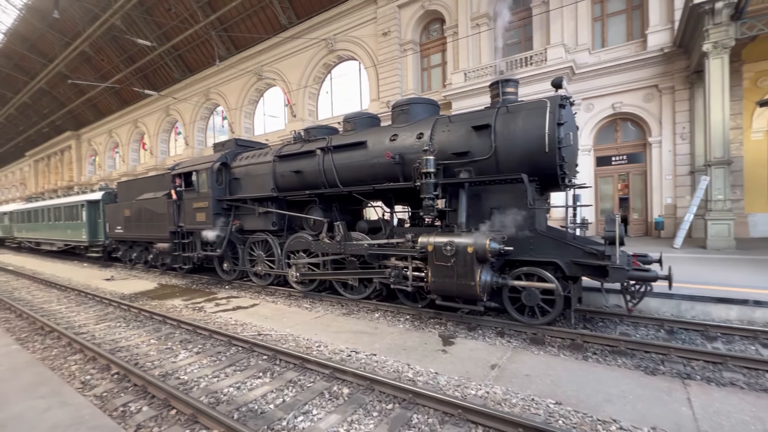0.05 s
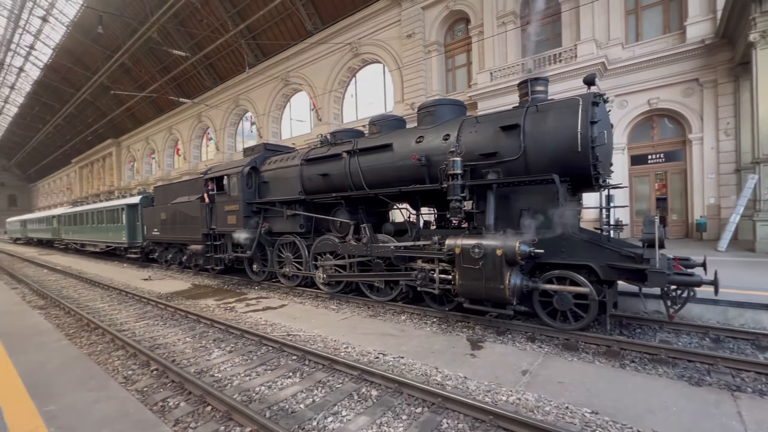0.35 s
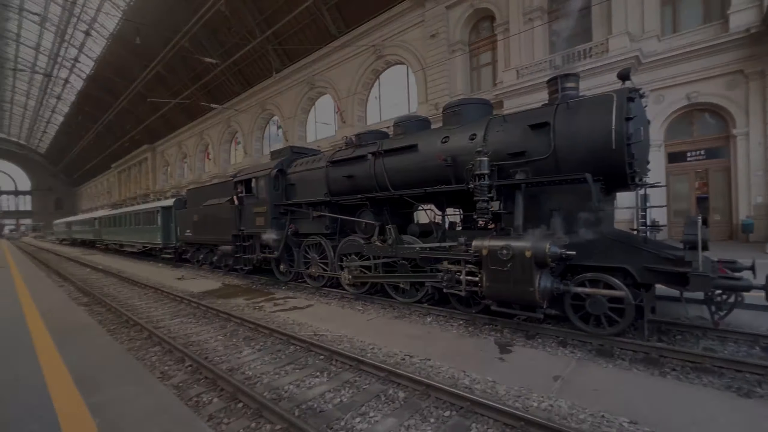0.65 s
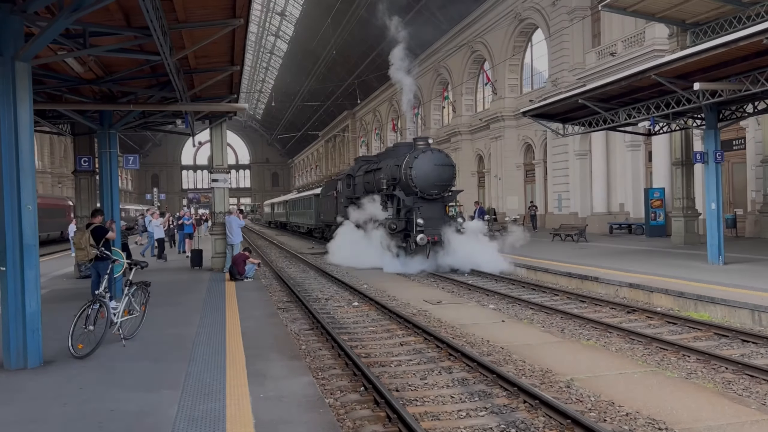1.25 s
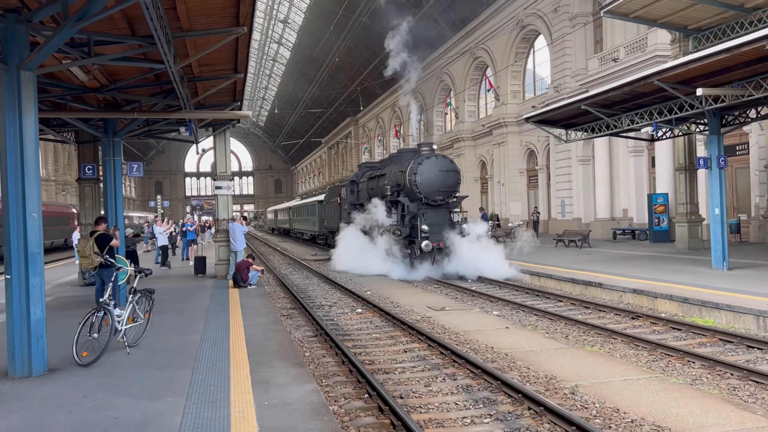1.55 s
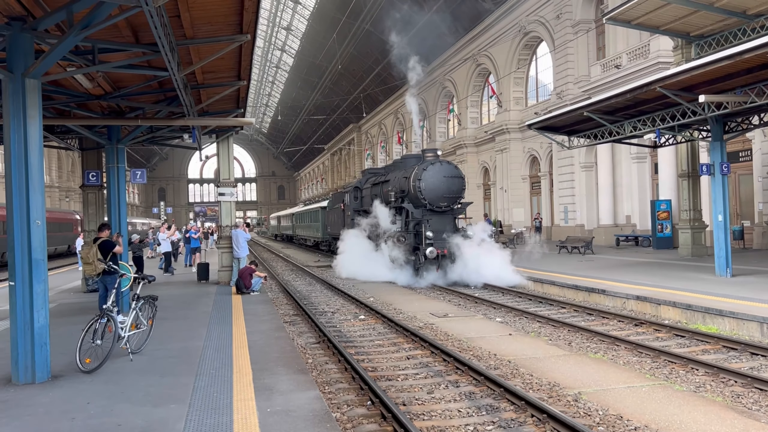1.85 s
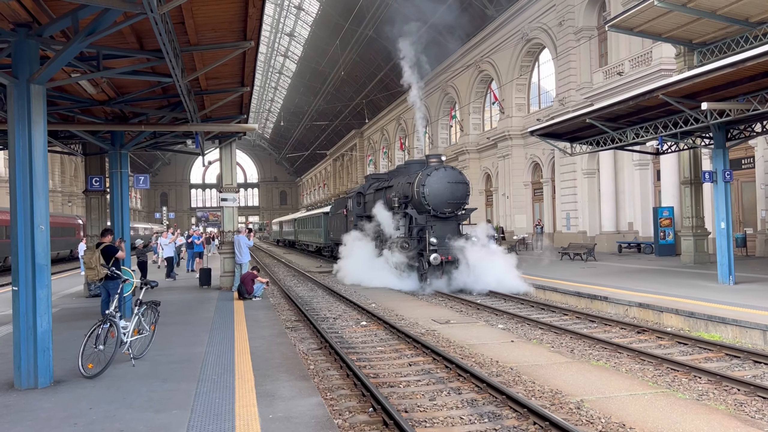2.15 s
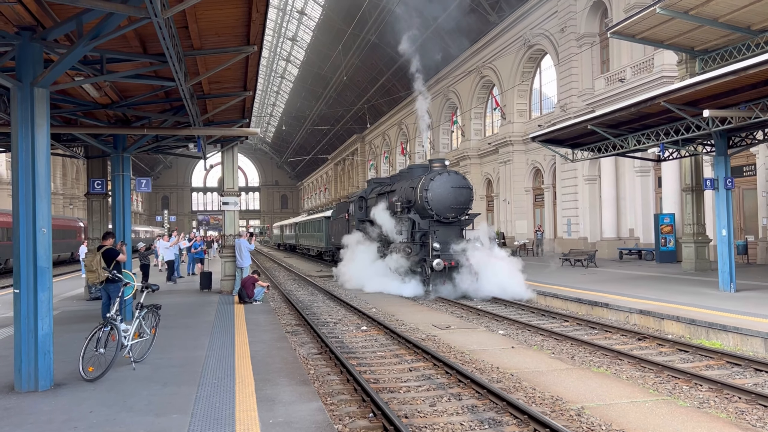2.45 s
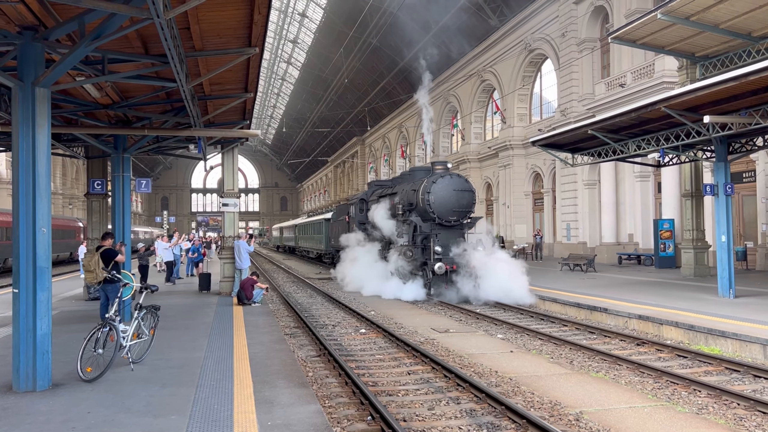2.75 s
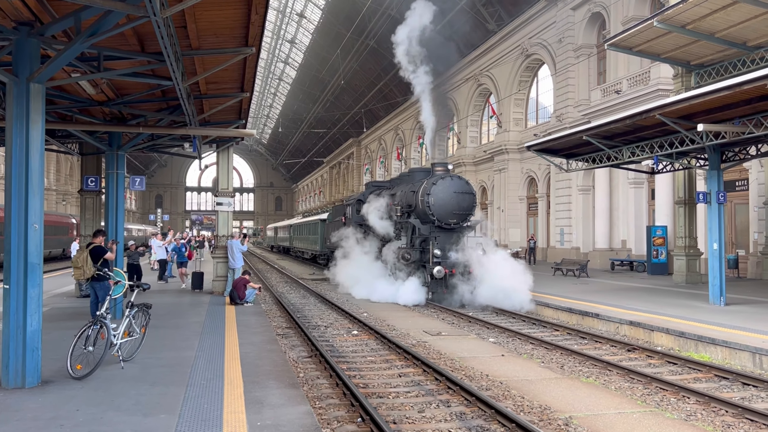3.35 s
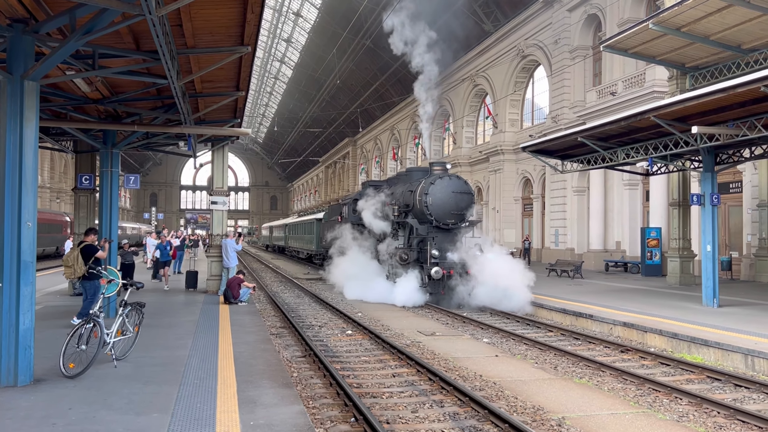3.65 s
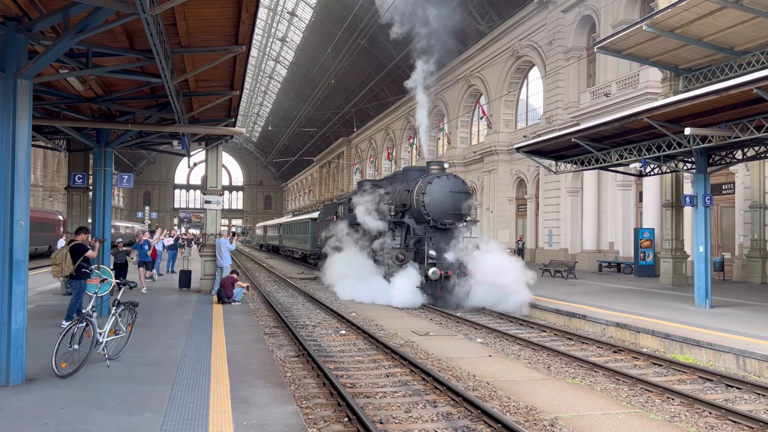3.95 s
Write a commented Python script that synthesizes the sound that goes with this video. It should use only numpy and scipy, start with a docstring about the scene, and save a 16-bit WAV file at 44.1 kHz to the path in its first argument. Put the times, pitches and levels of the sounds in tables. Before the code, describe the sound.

A steam locomotive hisses loudly in a large station hall and gives one deep chuff.

```python
"""Steam locomotive in a station hall

With the microphone at the engine's side, a rush of steam dies away over the idling engine and fades out.
The sound fades in again from the front: the open cylinder drain cocks swell to a dense hiss with a
hoarse, slowly rising resonance, the hall returns a diffuse roar, and the chimney gives one deep chuff."""
import sys
import numpy as np
from scipy import signal
from scipy.fft import rfft, irfft, next_fast_len
from scipy.io import wavfile
from scipy.ndimage import uniform_filter1d, map_coordinates

SR = 44100
rng = np.random.default_rng(int(sys.argv[2]) if len(sys.argv) > 2 else 0)


def transcribe(u):
    """Save the signal u as a 16-bit wav file named by the first command-line argument.

    u: samples, shape (n,) or (channels, n), limited to [-1, 1]; the rate is SR.
    q: integer samples, one column per channel.
    """
    v = np.clip(np.atleast_2d(u).T, -1, 1)
    q = np.round(v * 32767).astype(np.int16)
    wavfile.write(sys.argv[1], SR, q)


N = 176400
T = np.arange(N) / SR


def amp(db):
    """Decibels to gain."""
    return 10 ** (np.asarray(db) / 20)


def unit(x):
    """Scale to rms 1."""
    return x / np.sqrt(np.mean(x ** 2) + 1e-20)


def along(points, hz):
    """Read (f/Hz, value) points on a log frequency axis."""
    freqs, values = np.transpose(points)
    return np.interp(np.log(hz + 1), np.log(freqs + 1), values)


def curve(points):
    """Read (t/s, value) points at every sample."""
    return np.interp(T, *np.transpose(points))


def wobble(rate_hz):
    """A smooth random curve with rate_hz knots a second."""
    return map_coordinates(rng.standard_normal(4096), [T * rate_hz], mode="wrap")


def filtered(x, response):
    """Filter x by a complex response of frequency."""
    size = next_fast_len(N + SR // 4)
    return irfft(rfft(x, size) * response(np.fft.rfftfreq(size, 1 / SR)), size)[..., :N]


def lean(left_db):
    """Left and right gains for a source louder on the left by left_db."""
    return amp(np.array([[.5], [-.5]]) * left_db)


def stereo(mid, side):
    """Mid and side to left and right, at rms 1."""
    return unit(np.array([mid + side, mid - side]))


def firm(x):
    """Even out the slow swells of a stereo noise, leaving rms 1."""
    power = uniform_filter1d(np.mean(x ** 2, axis=0), size=1500)
    return x / np.sqrt(np.abs(power) + 1e-12)


def rush(spectrum, correlation, patchy_db):
    """Turbulent stereo noise of rms 1, with brief patches of random gain; spectrum is a density shape."""
    def mid_side_gains(hz):
        angle = np.arccos(np.clip(along(correlation, hz), -.99, .99)) / 2
        return amp(along(spectrum, hz)) * [np.cos(angle), np.sin(angle)]

    cells = signal.stft(rng.standard_normal((2, N)), nperseg=256)[2]
    patches = uniform_filter1d(rng.standard_normal(cells.shape[1:]), size=8, axis=0)
    patches = uniform_filter1d(patches, size=10, axis=1)
    noise = signal.istft(cells * amp(patchy_db * unit(patches)), nperseg=256)[1][:, :N]
    return stereo(*filtered(noise, mid_side_gains))


def resonance(centre_hz, half_width_hz, side_db):
    """Stereo noise of rms 1 in a narrow band around a steady or moving centre."""
    noise = rng.standard_normal((2, 2, N))
    in_phase, quadrature = filtered(noise, lambda hz: 1 / np.sqrt(1 + (hz / half_width_hz) ** 4))
    phase = 2 * np.pi * np.cumsum(centre_hz * np.ones(N)) / SR
    mid, side = in_phase * np.cos(phase) + quadrature * np.sin(phase)
    return stereo(mid, side * amp(side_db))


# Steam hiss at the engine's side, with a deep gap near 10 kHz from audio coding (f/Hz, level/dB)
STEAM_SPECTRUM = [(200, -16), (450, -10.5), (750, -8), (1020, -2.5), (1400, -2), (1900, -3), (2400, -4),
                  (3600, -9), (4400, -9.5), (4900, -7), (5700, -10), (6300, -11), (7000, -12), (8200, -16),
                  (9200, -21), (10200, -47), (11400, -21), (13000, -31), (15500, -38)]
STEAM_CORRELATION = [(300, 0.5), (700, .3), (1300, 0.43), (2200, -0.14), (5000, -0.085), (7000, 0.3),
                     (10000, -0.35), (12000, 1), (14500, -1.1)]  # its stereo image (f/Hz, left-right correlation)
STEAM_NOTCHES = [(5340, 200, -8), (7530, 300, -12)]  # hollows in its colour (f/Hz, half width/Hz, level/dB)
STEAM_RINGS = [(1230, 10, -12.5), (1427, 86, -8.5)]  # its resonances (f/Hz, half width/Hz, level/dB re the steam)
STEAM_LEVEL = [(0, -21.5), (.1, -26.5), (.26, -32), (.5, -37.5), (.88, -40.5)]  # its decay, before the fade (t/s, level/dB)
def dying_steam():
    """At the engine's side, a little right of the microphone: ringing steam dies away in the hall."""
    def hollows(hz):
        return amp(sum(db * np.exp(-((hz - centre) / width) ** 2) for centre, width, db in STEAM_NOTCHES))

    steam = filtered(rush(STEAM_SPECTRUM, STEAM_CORRELATION, patchy_db=0.55), hollows)
    ringing = sum(amp(db) * resonance(hz, width, side_db=-1) for hz, width, db in STEAM_RINGS)
    level_db = curve(STEAM_LEVEL) + 0.49 * wobble(25.3)
    return amp(level_db) * (steam + ringing) * lean(left_db=-1.5)


ENGINE_SPECTRUM = [(25, -16), (45, -4.5), (85, 1), (125, -5.5), (170, -3.5), (250, -5.5), (330, -14.5),
                   (600, -10.5), (1500, -27), (6000, -30)]  # idling engine from the side (f/Hz, level/dB)
ENGINE_LEVEL = [(.3, -41), (.85, -40)]  # its rumble, before the fade (t/s, level/dB)
LOW_CORRELATION = [(60, 0.96), (160, 0.98), (350, 0.78), (700, 0.55), (1500, 0.16)]  # stereo image of all low rushes (f/Hz, left-right correlation)
def idling_engine(hum_hz=367, hum_db=-52.5):
    """Beside the standing engine: an even rumble and a faint, wavering hum."""
    hum = amp(hum_db + 1.9 * wobble(8)) * np.sqrt(2) * np.sin(2 * np.pi * hum_hz * T)
    rumble = firm(rush(ENGINE_SPECTRUM, LOW_CORRELATION, patchy_db=1.2))
    return amp(curve(ENGINE_LEVEL)) * rumble + hum


STEAM_FLOW = [(.9, -10), (1.25, -11), (1.55, -6.5), (1.83, -3.5), (2.05, -0.5), (2.25, 0.5), (2.6, 0),
              (3.0, 0.4), (3.4, -2), (3.75, -3), (4, -3)]  # strength of the flow from the cocks (t/s, level/dB)
# Diffuse roar of the hall, with a deep gap near 10 kHz from audio coding (f/Hz, level/dB)
ROAR_SPECTRUM = [(300, -16.5), (800, -10.5), (1150, -3), (1600, -1), (2200, -2), (2500, -5), (2850, -5.5),
                 (3100, -7.5), (3450, -6.5), (4400, -6.5), (5200, -6.5), (5650, -9.5), (6300, -11),
                 (7000, -11), (10000, -50), (16000, -29)]
ROAR_CORRELATION = [(500, 0.75), (1100, -0.071), (1750, 0.13), (2600, 0.47), (3400, 0.064), (4800, 0.3),
                    (5800, -0.29), (6800, 0.12), (9000, -0.098)]  # its stereo image (f/Hz, left-right correlation)
ROAR_BALANCE = [(400, 1.5), (1400, 4.3), (2500, 3.8), (5200, 4.5), (6500, 2.5)]  # its lean to the left (f/Hz, level/dB left minus right)
JET_SPECTRUM = [(2000, -10), (5500, -12), (7200, -1.5), (8600, 2), (10100, -5.5), (11500, 2), (12800, -3.5),
                (14300, -3), (15600, -8.5)]  # hiss straight from the jets (f/Hz, level/dB)
JET_CORRELATION = [(5000, 0.41), (8500, 0.93), (10200, 1), (11700, 0.99), (13500, 1), (15500, .6)]  # its stereo image (f/Hz, left-right correlation)
def drain_cocks(roar_db=-23, hiss_db=-26.5, right_lead_ms=0.1474):
    """From the front: one sputtering flow drives the direct hiss, a little right, and the hall's roar."""
    def right_first(hz):
        return np.exp(1j * np.pi * hz * right_lead_ms / 1000 * np.array([[-1], [1]]))

    flow_db = curve(STEAM_FLOW) + 0.16 * wobble(21.6) + 0.29 * wobble(160)
    roar = rush(ROAR_SPECTRUM, ROAR_CORRELATION, patchy_db=0.6)
    roar = filtered(roar, lambda hz: lean(along(ROAR_BALANCE, hz)))
    hiss = filtered(rush(JET_SPECTRUM, JET_CORRELATION, patchy_db=0.83), right_first)
    hiss_gain = amp(hiss_db + 1.01 * flow_db + 0.12 * wobble(60))
    return amp(roar_db + flow_db) * roar + hiss_gain * hiss


ROAR_RINGS = [(652, -46.5), (1209, -39.5), (1005, -46.5), (1550, -41.5), (2690, -41.5), (3380, -42),
              (3960, -45)]  # faint steady pitches within the roar (f/Hz, level/dB re the flow)
def roar_rings(relative_half_width=0.016):
    """Left of the microphone: narrow resonances swell with the flow."""
    def peaks(hz):
        power = sum(amp(db) ** 2 / centre / (1 + ((hz / centre - 1) / relative_half_width) ** 2) ** 2
                    for centre, db in ROAR_RINGS)
        return np.sqrt(power)

    mid, side = filtered(rng.standard_normal((2, N)), peaks)
    total_rms = np.sqrt(sum(amp(db) ** 2 for _, db in ROAR_RINGS))
    return total_rms * amp(curve(STEAM_FLOW)) * stereo(mid, side * amp(-1)) * lean(left_db=4.3)


CLOUD_SPECTRUM = [(150, -17), (300, -9.5), (480, -2.5), (670, 1), (850, -2.5), (1200, 0.5), (2500, -27)]  # billowing steam (f/Hz, level/dB)
CLOUD_LEVEL = [(.9, -52.5), (1.5, -44), (1.85, -38), (2.15, -32), (3, -32), (4, -31)]  # its swell (t/s, level/dB)
def steam_clouds():
    """Down beside the wheels: the low rush of steam clouds as they build."""
    clouds = rush(CLOUD_SPECTRUM, LOW_CORRELATION, patchy_db=1.1)
    return amp(curve(CLOUD_LEVEL)) * clouds * lean(left_db=0.91)


BOILER_SPECTRUM = [(22, -31), (32, -24), (45, 3), (75, 1.5), (130, -4), (220, 1.5), (300, -10.5),
                   (600, -38)]  # boiler rumble from the front (f/Hz, level/dB)
BOILER_LEVEL = [(.9, -54), (1.5, -48), (2.1, -39), (2.6, -43.5), (3.1, -42.5), (4, -43.5)]  # its swell (t/s, level/dB)
DRONE_BANDS = [(96, -5.5), (195, -8), (242, -13)]  # its drone (f/Hz, level/dB re the rumble)
def boiler():
    """Straight ahead of the microphone: the boiler rumbles with a rough, uneven drone."""
    drone = sum(amp(db) * resonance(hz, half_width_hz=5.8, side_db=-16) for hz, db in DRONE_BANDS)
    rumble = firm(rush(BOILER_SPECTRUM, LOW_CORRELATION, patchy_db=1.5))
    return amp(curve(BOILER_LEVEL)) * (rumble + drone)


HOWL_PITCH = [(1, 1640), (2.08, 1635), (2.55, 1680), (3.1, 1730), (4, 1730.5)]  # centre of the cocks' hoarse resonance (t/s, f/Hz)
HOWL_SWELL = [(1, -56), (1.94, -37.5), (2.03, -29.5), (2.12, -36.5), (2.24, -28.5), (2.62, -25.5),
              (2.71, -28.5), (3.5, -30), (4, -34)]  # its strength (t/s, level/dB)
def howl(flutter_db=2.2):
    """Left of the microphone: the jets excite a broad, fluttering resonance whose pitch creeps up."""
    level_db = curve(HOWL_SWELL) + flutter_db * wobble(29.93)
    band = resonance(curve(HOWL_PITCH), half_width_hz=127, side_db=-7.5)
    return amp(level_db) * band * lean(left_db=3.5)


COCK_WHISTLES = [(1.15, 2.004, 2697, 89, -44.5), (1.98, 2.71, 1580, 12, -34.5),
                 (2.25, 3.2, 1795, 15, -39.5)]  # whistling cocks (start t/s, end t/s, f/Hz, half width/Hz, level/dB)
def whistles(ramp_s=0.063):
    """Left of the microphone: airy whistles catch and let go as the pressure at the cocks changes."""
    sound = np.zeros((2, N))
    for start, end, hz, width, db in COCK_WHISTLES:
        gate = np.clip(np.minimum(T - start, end - T) / ramp_s, 0, 1)
        sound += amp(db) * gate * resonance(hz, width, side_db=-2)
    return sound * lean(left_db=3.5)


PUFFS = [(3.169, -31), (3.295, -39)]  # the chuff and its echo from farther off in the hall (t/s, level/dB)
PUFF_SPECTRUM = [(25, -24), (55, -5), (90, -3), (125, 4), (190, -6), (270, -38), (600, -49)]  # exhaust at the chimney (f/Hz, level/dB)
def chimney(attack_s=0.012, hold_s=0.09, t60_s=0.23, thump_hz=62.3, thump_db=-28, thump_t60_s=0.16):
    """Up at the chimney: a deep puff of exhaust opens with a thump, and the hall echoes the puff."""
    envelope = np.zeros(N)
    for start, db in PUFFS:
        attack = np.clip((T - start) / attack_s, 0, 1)
        decay_db = 60 * np.maximum(T - start - hold_s, 0) / t60_s
        envelope += attack * amp(db - decay_db)
    exhaust = firm(rush(PUFF_SPECTRUM, LOW_CORRELATION, patchy_db=3.0))
    age = np.maximum(T - PUFFS[0][0], 0)
    thump = amp(thump_db - 60 * age / thump_t60_s) * np.sin(2 * np.pi * thump_hz * age)
    return envelope * exhaust + thump


def scene(switch_s=0.9006, fade_out_s=0.61, fade_in_s=0.37):
    """Two microphone positions in the hall: the side fades to silence, then the front fades in."""
    beside = dying_steam() + idling_engine()
    in_front = drain_cocks() + roar_rings() + steam_clouds() + boiler() + howl() + whistles() + chimney()
    fade_out = np.clip((switch_s - T) / fade_out_s, 0, 1)
    fade_in = np.clip((T - switch_s) / fade_in_s, 0, 1)
    return fade_out * beside + fade_in * in_front


def record(dry, low_cut_hz=41, top_hz=15750):
    """The microphone chain cuts the deepest bass and keeps nothing above its band limit."""
    def passband(hz):
        low_cut = (hz / low_cut_hz) ** 4 / np.sqrt(1 + (hz / low_cut_hz) ** 8)
        return low_cut * (hz < top_hz)

    return filtered(dry, passband)


dry = scene()
out = record(dry)
transcribe(out)
```